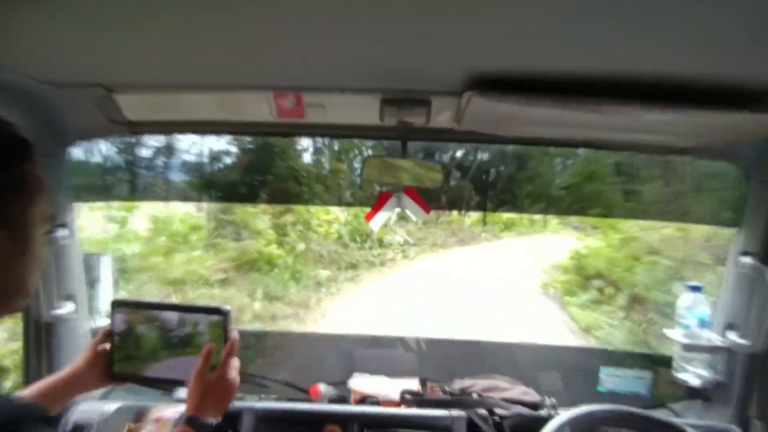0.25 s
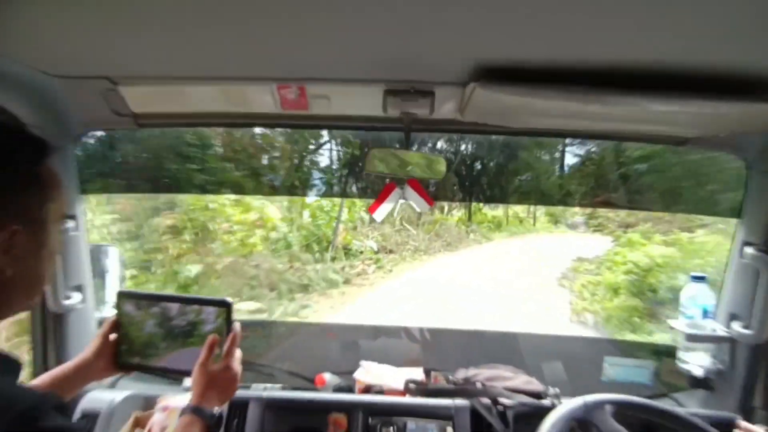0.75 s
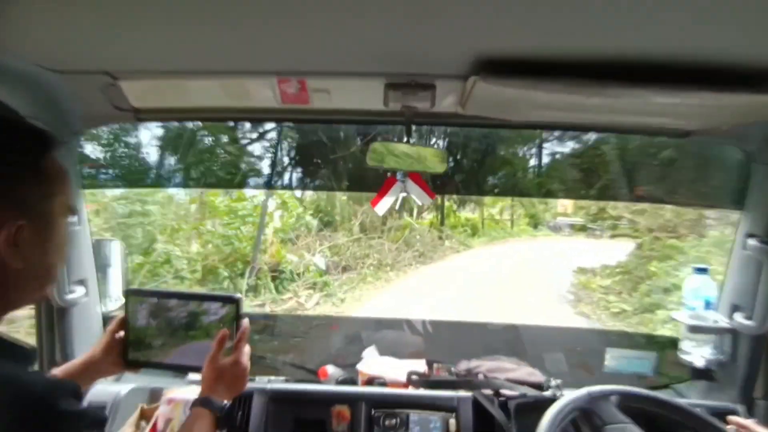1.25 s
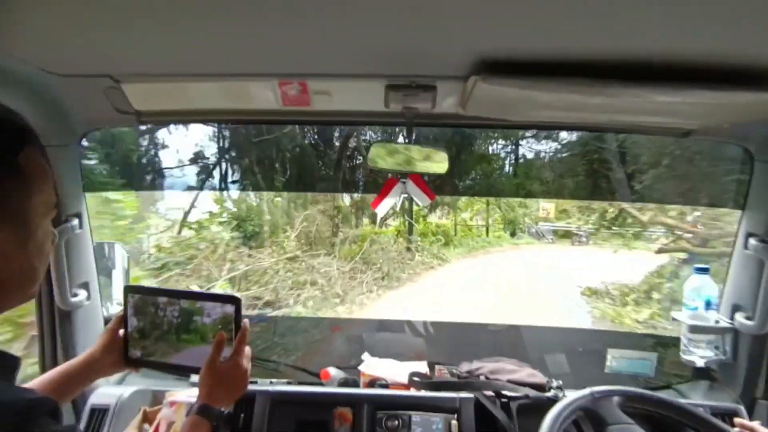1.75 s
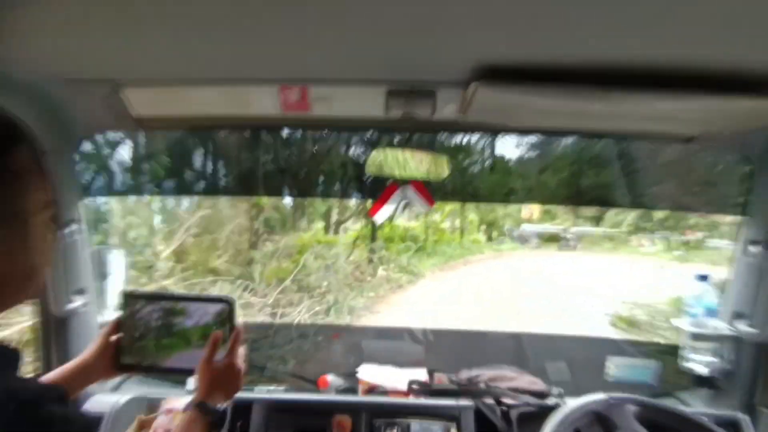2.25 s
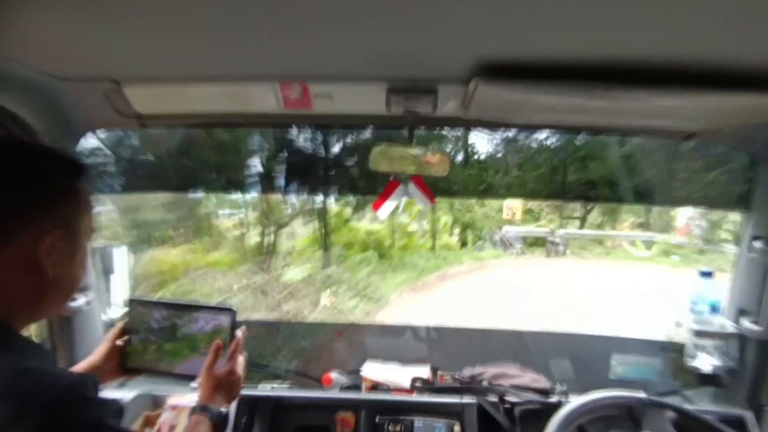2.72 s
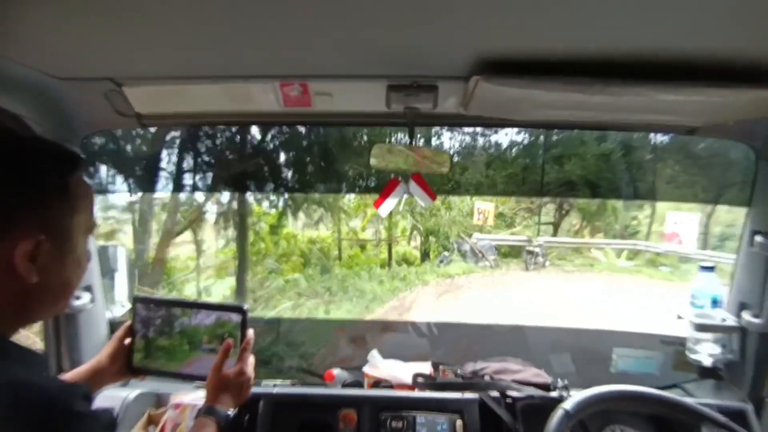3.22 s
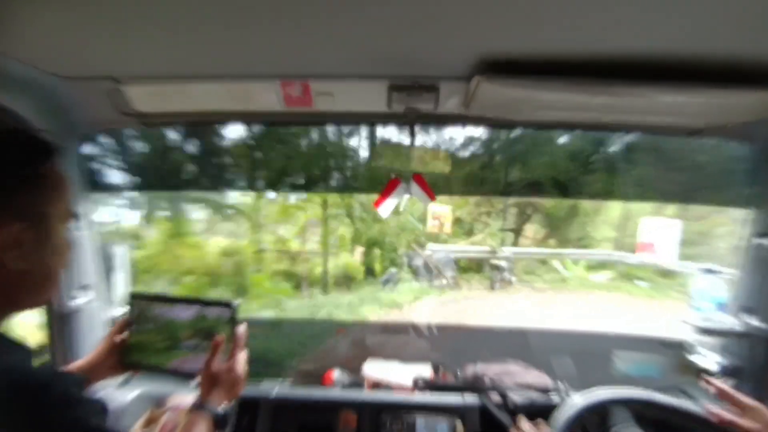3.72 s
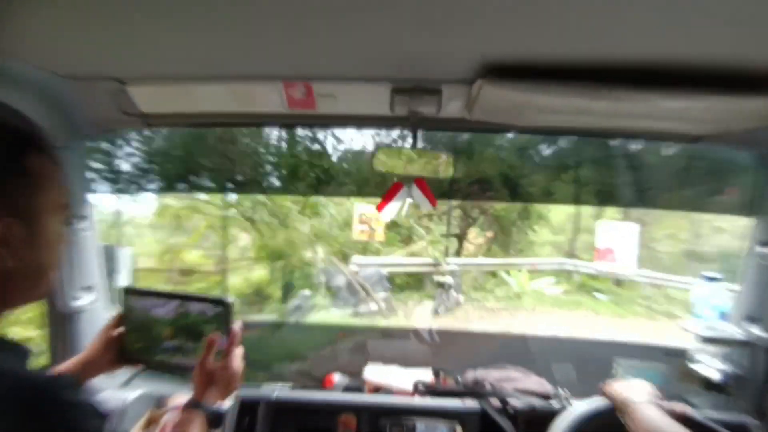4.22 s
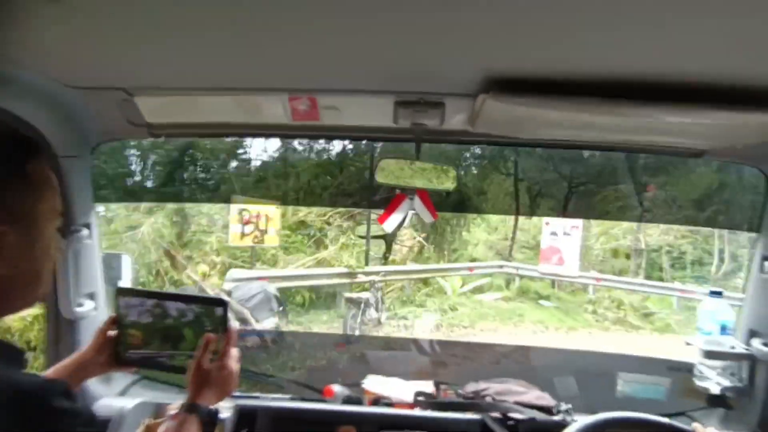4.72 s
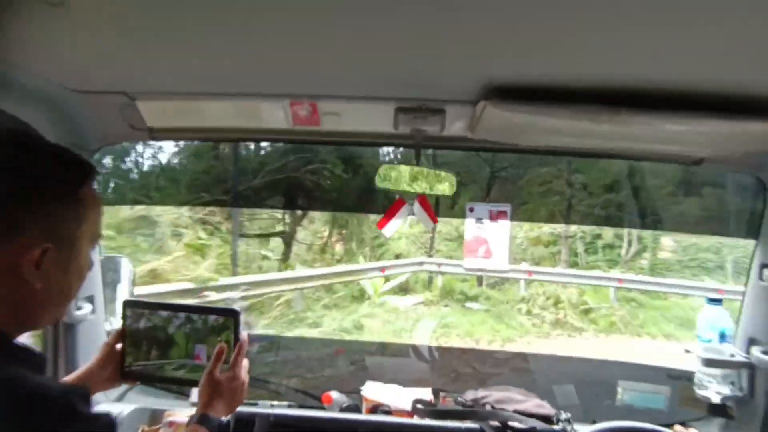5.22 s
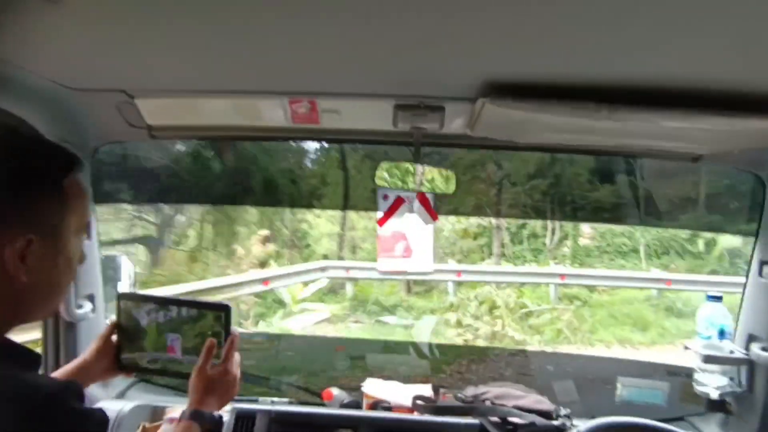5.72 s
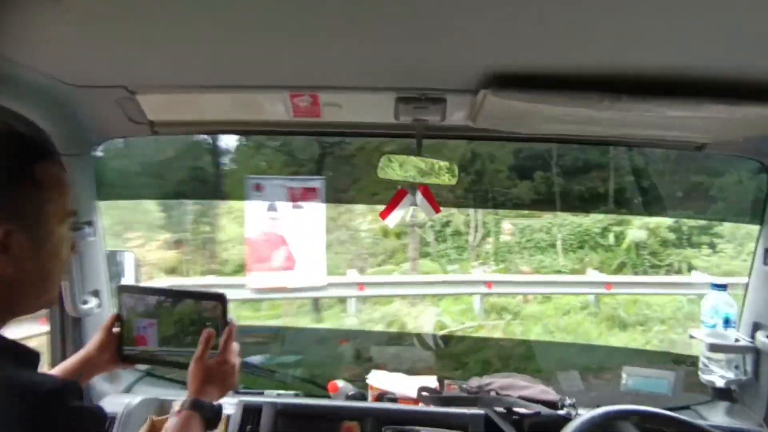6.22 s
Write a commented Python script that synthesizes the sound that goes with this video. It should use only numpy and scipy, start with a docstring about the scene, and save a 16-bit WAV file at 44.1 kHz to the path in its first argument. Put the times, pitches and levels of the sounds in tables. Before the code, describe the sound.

Inside a small truck cab, a diesel engine pulls steadily, then eases off with an air hiss, knocks and a sinking, booming drone.

```python
"""Inside the cab of a small diesel truck on a country road, heard by a pair of microphones.
The four-cylinder engine pulls steadily over road rumble and rushing air; trim scuffs, then the driver lifts off
for a bend as air hisses, as from a brake valve. A bump and a run of loose knocks follow. The note sinks until it
booms in the cab; something small buzzes by the left microphone and plastic squeaks. Near the end come
more knocks, a fainter hiss and two soft bumps. Engine and bumps are sines, air and road are shaped noise."""
import sys
import numpy as np
from scipy import signal
from scipy.fft import rfft, irfft, next_fast_len
from scipy.io import wavfile
from scipy.ndimage import map_coordinates

SR = 44100
rng = np.random.default_rng(int(sys.argv[2]) if len(sys.argv) > 2 else 0)


def int16_out(signal):
    """Quantize to a 16-bit WAV file."""
    q = np.round(np.clip(np.atleast_2d(signal).T, -1, 1) * 32767)
    wavfile.write(sys.argv[1], SR, q.astype(np.int16))


N = 284867
TIME = np.arange(N) / SR   # s

# Engine speed: (time [s], firing rate [Hz])
ENGINE_SPEED = [(0, 65.3), (0.8, 65), (1.5, 64.4), (1.75, 63.4), (2.15, 64), (2.85, 57.8), (3.4, 54.2),
                (3.97, 47.5), (4.5, 42.6), (4.85, 40.1), (5.15, 38.8), (5.6, 35.6), (6.1, 30.6),
                (6.46, 28.6)]
LIFT_OFF_S, LIFT_OFF_TAKES_S = 1.59, 0.16   # the throttle closes
BRAKING_S, BRAKING_TAKES_S = 2.19, 0.81   # the slack is taken up and the wheels drive the engine
BRAKING_FADES_HZ, BRAKING_FADE_POWER = 42.3, 2.22   # below this firing rate engine braking weakens
SLACK_SHARE = 0.15   # share of the coasting boom left while the engine neither pulls nor brakes
CRUISE_HZ = 65   # firing rate at cruising speed

# Firing harmonics before swells and dips: (multiple of firing rate, pulling level [dB], coasting level [dB])
FIRING_HARMONICS = [(1, -34.5, -22), (2, -30, -32.5), (3, -50, -40.5), (4, -52, -47.5)]
# Weaker tones: (multiple of crank rate, rounded for the pitch; pulling level [dB], coasting level [dB])
CRANK_OVERTONES = [(0.99, -43, -31), (2.95, -33.5, -44.5), (4.94, -36.5, -45.5), (7, -61, -46.5),
                   (8.76, -59, -53), (9.974, -40.5, -47), (10.9, -50, -54), (11.82, -52, -50.5),
                   (13.13, -56, -58), (13.986, -63, -54), (16, -57.5, -57.5), (18.25, -57.5, -60.5),
                   (19.3, -62, -64), (20.1, -71, -65.5), (22.3, -55, -65.5), (34, -65, -85),
                   (42, -62.5, -82)]
# Engine rocking as the load comes off: (time [s], level [dB], rise [s], fall [s], left over right [dB])
LOAD_SHUDDER = [(1.7, -19, 0.14, 0.2, -0.5)]
# Frequencies at which the engine's low tones swell or dip: (frequency [Hz], width [Hz], lift [dB])
LOW_TONE_LIFTS = [(36.07, 4.8, 19), (41.2, 1.7, -6), (44.3, 2.4, 3.5), (47.18, 1.2, -7), (59, 4.3, 2),
                  (80.7, 8.1, -14.5), (96, 11.3, 14.5), (129.4, 29, 8), (164.6, 12.3, 14),
                  (175.3, 3.8, -4.5), (181, 8.4, 9), (207.2, 17.2, 18.5)]
# Cab air resonances that lift the weaker tones: (frequency [Hz], width [Hz], lift [dB])
CAB_AIR_RESONANCES = [(243, 11, 2.5), (279, 18, 5.5), (338.3, 24, 9), (543, 61, 7.5)]

# Air valve puffs: (time [s], level [dB], rise [s], fall [s], left over right [dB])
VALVE_PUFFS = [(1.595, -28, 0.043, 0.047, 0), (5.36, -35.5, 0.034, 0.057, 0)]
# Colour of the escaping air: (frequency [Hz], relative density [dB per Hz])
VALVE_COLOUR = [(1200, -20), (2400, -5), (3600, -6.5), (5700, -7), (6800, 1.5), (7600, 0.5), (8400, 0),
                (10000, -7.5), (11500, -13.5), (13500, -6), (15500, -7.5)]

# Knocks of loose trim: (time [s], relative level [dB])
TRIM_KNOCKS = [(2.173, -31), (2.2499, -26.5), (2.3246, -32), (2.3979, -29), (2.4827, -29), (5.0428, -34.5),
               (5.563, -27), (5.6409, -30)]
# Modes of the plastic trim: (frequency [Hz], relative level [dB], 60 dB decay [s])
TRIM_MODES = [(715, -6, 0.059), (1564, -1.5, 0.037), (2370, -14, .035), (3170, -4, 0.04), (4270, -9, 0.027),
              (4720, -10, .03), (6000, -17, .025), (8360, -10, 0.028)]
# Short scuffs of trim: (time [s], level [dB], rise [s], fall [s], left over right [dB])
TRIM_SCUFFS = [(1.414, -28.5, 0.0024, 0.0092, 0), (1.47, -32.5, 0.0018, 0.0055, 2),
               (4.828, -41.5, 0.0059, .01, -2), (5.119, -34.5, 0.009, 0.016, -1), (5.9, -49, .01, .012, 4)]
# Colour of cracks and scuffs: (frequency [Hz], relative density [dB per Hz])
CRACK_COLOUR = [(380, 7), (700, 0), (1100, 1), (4000, -2), (8000, -9.5), (11000, -17.5), (14000, -17)]

# Bouts of buzzing: (time of hardest tick [s], relative level [dB], rise [s], fall [s], ticks per firing)
BUZZ_BOUTS = [(3.856, -40, 0.098, 0.15, 2), (4.08, -40.5, .008, 0.032, 1), (4.4013, -26, .035, 0.066, 1),
              (4.634, -42.5, .04, 0.027, 1)]
# Colour of one buzzing tick: (frequency [Hz], relative density [dB per Hz])
TICK_COLOUR = [(1500, -6), (4000, -2.5), (6000, -6), (8200, 2), (11000, -6), (15500, -5)]
# A tiny squeak of plastic: (time [s], level [dB], rise [s], fall [s], left over right [dB])
PLASTIC_SQUEAKS = [(4.67, -43.5, .004, .005, 4)]
# Bumps that shake the cab: (time [s], level [dB], rise [s], fall [s], answering mode [Hz])
ROAD_BUMPS = [(2.28, -12.5, 0.088, 0.055, 38.04), (5.655, -21.5, .012, .03, 92.1),
              (6.2, -22, 0.093, 0.033, 32.18)]

# Road shake: (time [s], level [dB])
ROAD_SHAKE = [(0, -22.5), (1.2, -20.5), (2.1, -19.5), (2.85, -20), (3.25, -25), (3.8, -23.5), (4.3, -27.5),
              (6.0, -25.5), (6.46, -27.5)]
# Colours of the ride, low to high: (frequency [Hz], relative density [dB per Hz])
RUMBLE_COLOUR = [(22, -18), (29, 0.5), (40, 0), (55, -5), (75, -10), (110, -19.5), (160, -26), (250, -38.5)]
DRONE_COLOUR = [(90, -10), (150, 3.5), (220, 2.5), (300, -1), (400, -5.5), (520, -12.5)]
GROWL_COLOUR = [(350, -18.5), (480, 0), (720, -5.5), (900, -6), (1120, -9), (1350, -9), (1600, -13.5),
                (2100, -31.5)]
RUSH_COLOUR = [(1300, -15.5), (1800, -2), (2200, -1.5), (2900, 1), (3700, -1), (4400, -4), (5500, -17)]
FIZZ_COLOUR = [(3800, -20), (4800, 0), (5900, -1.5), (6900, 1.5), (8400, -1.5), (10000, -5.5),
               (11500, -9.5), (14000, -3.5), (15500, -8.5)]
# How those noises follow the engine: (level coasting at cruising speed [dB], slope [dB per octave of speed],
# rise when pulling [dB], drop when slack [dB])
DRONE_LAW = (-37, 6, 3.3, 3)
GROWL_LAW = (-41, 7.5, -0.5, 2.5)
RUSH_LAW = (-41.5, 9, -0.3, 3)
FIZZ_LAW = (-44.5, 9.5, -0.5, 6.5)

# Panels and gaps that colour every cab noise: (frequency [Hz], width [Hz], lift [dB])
PANEL_RESONANCES = [(773, 100, 2), (1118, 67, 6), (1566, 62, 2.5), (2160, 140, 3.5), (3720, 140, 3),
                    (5400, 250, 2), (6440, 150, 2.5), (8300, 250, 2.5)]
# Likeness of the noise at the two microphones: (frequency [Hz], correlation [-1 to 1])
LEFT_RIGHT_LIKENESS = [(30, .99), (60, 0.66), (150, 1), (270, 0.78), (450, 0.2), (740, 0.085),
                       (1200, -0.27), (2000, 0.061), (12000, -0.11)]
# Treble difference of the two microphones: (frequency [Hz], left over right [dB])
MIC_BALANCE = [(2000, 0), (3300, -0.2), (4500, -1.5), (6500, -2.8), (9000, 0.5), (12000, -3), (15000, -7)]
CUTOFF_HZ = 15600


def engine_tones(crank, firing_hz, load, braking, overtone_pan_db=1.0):
    """Firing harmonics swell and dip as they glide; weaker crank orders waver more when coasting."""
    fade = np.minimum(firing_hz / BRAKING_FADES_HZ, 1) ** BRAKING_FADE_POWER
    slack = 1 - load - braking
    coasting = (braking + SLACK_SHARE * slack) * fade
    boom = overtones = 0
    for k, pulling_db, coasting_db in FIRING_HARMONICS:
        wavering_db = coasting_db + .35 * k * drift(5)
        strength = load * from_db(pulling_db) + coasting * from_db(wavering_db)
        strength = strength * from_db(lift_db(LOW_TONE_LIFTS, k * firing_hz))
        rocking = swells(LOAD_SHUDDER) if k == 1 else 0
        # two firings per crank turn
        boom += (strength + rocking) * tone(2 * k * crank, rough=0.055, skew=0.17 * k)
    for k, pulling_db, coasting_db in CRANK_OVERTONES:
        wavering_db = coasting_db + 2.44 * drift(4)
        strength = load * from_db(pulling_db) + braking * from_db(wavering_db)
        strength = strength * from_db(lift_db(CAB_AIR_RESONANCES, k * firing_hz / 2))
        overtones += strength * tone(round(k) * crank, rough=0.15, skew=0.64)
    return boom + overtones * pan(overtone_pan_db)


def air_valve(whistle_hz=6800, whistle_t60=0.055, whistle_db=-10):
    """Escaping air is a puff of turbulent noise, with a faint whistle from the port."""
    jet = cab_noise(VALVE_COLOUR)
    whistle = rms_one(ring(rng.standard_normal((2, N)), whistle_hz, whistle_t60))
    return swells(VALVE_PUFFS) * (jet + from_db(whistle_db) * whistle)


def trim(ring_db=-3, crack_db=4.0, tail_db=-12):
    """Loose plastic knocks: a crack, its modes, and a short tail in the cab; at times it only scuffs."""
    at = [int(s * SR) for s, db in TRIM_KNOCKS]
    knock_db = np.array(TRIM_KNOCKS)[:, 1]
    ringing = np.zeros((2, N))
    for k, (hz, level_db, t60) in enumerate(TRIM_MODES):
        uneven_db = rng.normal(0, 0.65, (len(at), 2)).T
        clicks = np.zeros((2, N))
        clicks[:, at] = from_db(knock_db + level_db + ring_db + uneven_db)
        ringing += (-1) ** k * ring(clicks, hz, t60)   # neighbouring modes start in opposite sense
    crack = from_db(crack_db) * bursts(TRIM_KNOCKS, rise_s=0.00019, fall_s=0.0031)
    tail = from_db(tail_db) * bursts(TRIM_KNOCKS, rise_s=.003, fall_s=0.019)
    return ringing + (crack + tail + swells(TRIM_SCUFFS)) * cab_noise(CRACK_COLOUR)


def buzz(crank, tick_db=16, side_db=22, uneven_db=1.7):
    """Something small by the left microphone is shaken into contact once or twice a firing, in bouts."""
    ticks = []
    for s, db, rise, fall, per_firing in BUZZ_BOUTS:
        swings = (crank - np.interp(s, TIME, crank)) / np.pi * per_firing
        at = np.flatnonzero(np.diff(np.floor(swings)))   # one contact per whole swing
        bout = swells([(s, db, rise, fall, 0)])[0, at]
        level_db = 20 * np.log10(bout) + uneven_db * drift(50)[at]
        ticks += zip(TIME[at], level_db)
    contacts = bursts(ticks, rise_s=0.00083, fall_s=0.00079)
    return from_db(tick_db - side_db / 2) * pan(side_db) * contacts * cab_noise(TICK_COLOUR)


def squeak(hz=3850, t60=0.0059):
    """Plastic rubs on plastic for an instant: noise through one damped mode."""
    return swells(PLASTIC_SQUEAKS) * rms_one(ring(rng.standard_normal((2, N)), hz, t60))


def bump():
    """Each bump sets the cab shuddering on a low mode."""
    out = np.zeros((2, N))
    for s, db, rise, fall, hz in ROAD_BUMPS:
        shudder = tone(2 * np.pi * hz * TIME, rough=0.073, skew=0)
        out += swells([(s, db, rise, fall, 0)]) * shudder
    return out


def ride(crank, firing_hz, load, braking, lope=0.083, cycle_lope=0.045, clatter=.09):
    """Road rumble, and noise that follows engine speed and effort and throbs with crank and cycle."""
    octaves = np.log2(firing_hz / CRUISE_HZ)
    slack = 1 - load - braking

    def follow(law):
        """Level in dB that follows engine speed, pull and slack."""
        db, per_octave_db, pulling_db, slack_db = law
        return db + per_octave_db * octaves + pulling_db * load - slack_db * slack

    throb = 1 + lope * np.cos(crank) + cycle_lope * np.cos(crank / 2)   # a four-stroke cycle is two turns
    # the treble clatters at two and four times the firing rate
    ticking = 1 + clatter * (1 - load / 2) * (np.cos(4 * crank) + np.cos(8 * crank))
    rumble = from_db(in_time(ROAD_SHAKE)[0]) * cab_noise(RUMBLE_COLOUR)
    drone = from_db(follow(DRONE_LAW)) * cab_noise(DRONE_COLOUR) * throb * pan(1.7)
    growl = from_db(follow(GROWL_LAW) + 1.16 * drift(14)) * cab_noise(GROWL_COLOUR) * throb * pan(0.43)
    rush = from_db(follow(RUSH_LAW) + 0.52 * drift(25)) * cab_noise(RUSH_COLOUR)
    fizz = from_db(follow(FIZZ_LAW) + 0.76 * drift(15)) * cab_noise(FIZZ_COLOUR) * ticking
    return rumble + drone + growl + rush + fizz


def tone(phase, rough, skew):
    """One stereo sine, shaken by slow chance in size and phase, its phase shifted between the sides."""
    angle = phase + rng.uniform(0, 2 * np.pi) + skew * np.array([[.5], [-.5]])
    steady = (1 + rough * drift(5)) * np.sin(angle)
    return np.sqrt(2) * (steady + rough * drift(5.6) * np.cos(angle))


def cab_noise(colour):
    """Stereo noise of a given colour, diffuse in the treble, falling steeply beyond its ends."""
    size = next_fast_len(N)
    hz = np.arange(size // 2 + 1) * SR / size + 1e-3
    low_skirt = 1 + (.8 * colour[0][0] / hz) ** 8
    high_skirt = 1 + (.8 * hz / colour[-1][0]) ** 8
    shape = from_db(at_hz(colour, hz) + lift_db(PANEL_RESONANCES, hz)) / np.sqrt(low_skirt * high_skirt)
    alike = np.clip(at_hz(LEFT_RIGHT_LIKENESS, hz), -.995, .995)
    mid, side = rfft(rng.standard_normal((2, size))) * shape
    stereo = np.sqrt(1 + alike) * mid + np.sqrt(1 - alike) * side * [[1], [-1]]
    return rms_one(irfft(stereo, size)[:, :N])


def ring(clicks, hz, t60):
    """A damped mode: a unit click sets a sine of height 1 ringing."""
    r = from_db(-60 / (t60 * SR))   # decay per sample
    w = 2 * np.pi * hz / SR
    return signal.lfilter([0, np.sin(w)], [1, -2 * r * np.cos(w), r * r], clicks + 1e-18)


def bursts(events, rise_s, fall_s):
    """Envelope of brief contacts that die away exponentially."""
    out, age = np.zeros(N), np.arange(SR // 8) / SR
    shape = (1 - np.exp(-age / rise_s)) * np.exp(-age / fall_s)
    for s, db in events:
        at = int(s * SR)
        out[at:at + len(age)] += from_db(db) * shape[:N - at]
    return out


def swells(events):
    """Stereo envelope of rounded swells with exponential skirts."""
    out = np.zeros((2, N))
    for s, db, rise, fall, side_db in events:
        away = np.abs(TIME - s) / np.where(TIME < s, rise, fall)
        out += from_db(db) * pan(side_db) / np.cosh(np.minimum(np.sqrt(2) * away, 20))
    return out


def drift(rate):
    """Slow chance: random knots, two per cycle of the rate in Hz, joined by lines."""
    knots = rng.standard_normal(int(2 * rate * N / SR) + 4)
    joined = map_coordinates(knots, [TIME * 2 * rate + 1], order=1, mode="nearest")
    return joined / np.sqrt(2 / 3)   # spread near 1


def ramp(middle_s, length_s):
    """A smooth change from 0 to 1."""
    return .5 + .5 * np.tanh(2 * (TIME - middle_s) / length_s)


def lift_db(resonances, hz):
    """How much a set of peaks and dips raises the sound at this frequency."""
    return sum(db / (1 + (2 * (hz - centre) / width) ** 2) for centre, width, db in resonances)


def pan(balance_db):
    """Left and right gains for a balance of left over right."""
    return from_db(np.array([[.5], [-.5]]) * balance_db)


def from_db(db):
    """Decibels to gain."""
    return 10 ** (np.asarray(db) / 20)


def rms_one(x):
    """Scale to unit power."""
    return x / np.sqrt(np.mean(x ** 2) + 1e-20)


def in_time(rows):
    """Each column of a curve at every sample."""
    s, *columns = np.transpose(rows)
    return [np.interp(TIME, s, c) for c in columns]


def at_hz(points, hz):
    """Read a spectrum on a log-frequency axis."""
    f, value = np.transpose(points)
    return np.interp(np.log(hz + 1e-3), np.log(f), value)


def scene():
    """The crank turns once for every two firings; the engine pulls, goes slack, then brakes the truck."""
    firing_hz, = in_time(ENGINE_SPEED)
    crank = np.pi * np.cumsum(firing_hz) / SR   # angle in radians
    load = 1 - ramp(LIFT_OFF_S, LIFT_OFF_TAKES_S)
    fade = np.minimum(firing_hz / BRAKING_FADES_HZ, 1) ** BRAKING_FADE_POWER
    braking = ramp(BRAKING_S, BRAKING_TAKES_S) * fade
    engine = crank, firing_hz, load, braking
    return engine_tones(*engine) + air_valve() + trim() + buzz(crank) + squeak() + bump() + ride(*engine)


def record(dry):
    """Each microphone has its own treble, and the top is cut steeply."""
    size = next_fast_len(N)
    hz = np.arange(size // 2 + 1) * SR / size
    heard = irfft(rfft(dry, size) * pan(at_hz(MIC_BALANCE, hz)), size)[:, :N]
    return signal.sosfilt(signal.ellip(10, .1, 80, CUTOFF_HZ, fs=SR, output="sos"), heard)


dry = scene()
out = record(dry)
int16_out(out)
```